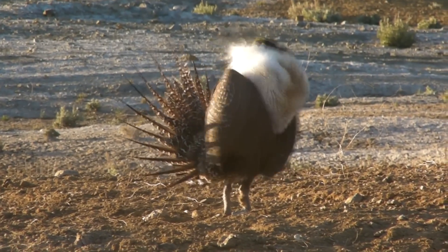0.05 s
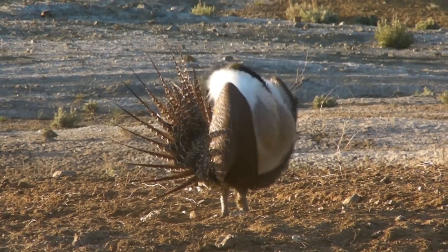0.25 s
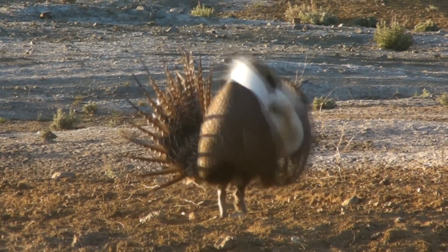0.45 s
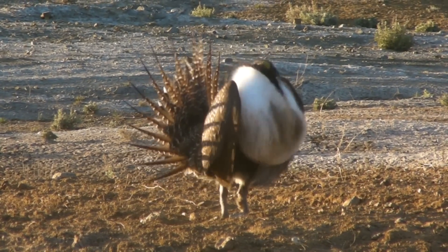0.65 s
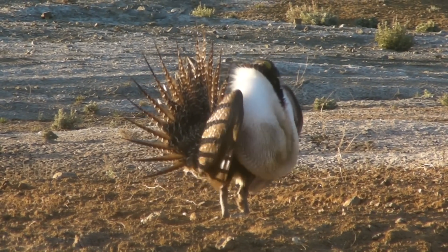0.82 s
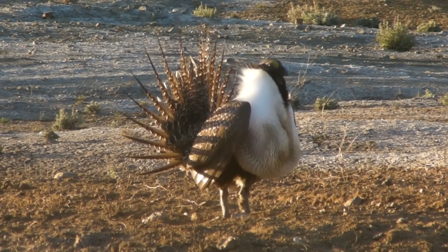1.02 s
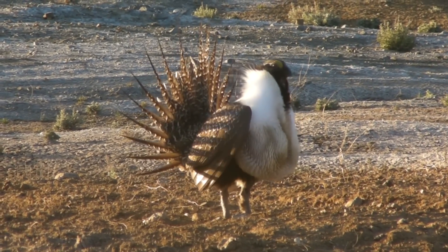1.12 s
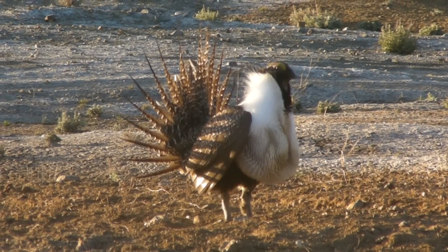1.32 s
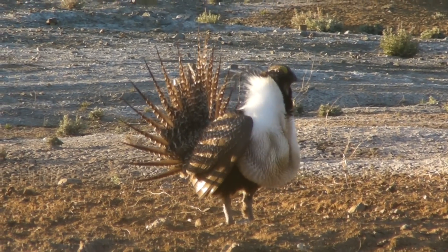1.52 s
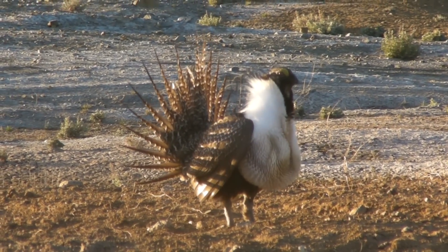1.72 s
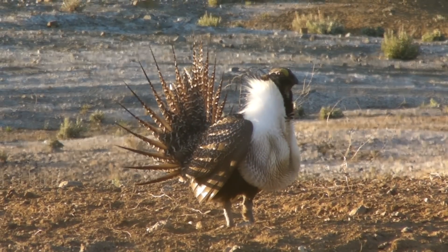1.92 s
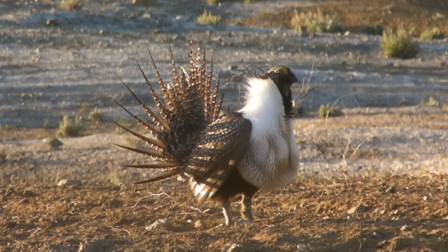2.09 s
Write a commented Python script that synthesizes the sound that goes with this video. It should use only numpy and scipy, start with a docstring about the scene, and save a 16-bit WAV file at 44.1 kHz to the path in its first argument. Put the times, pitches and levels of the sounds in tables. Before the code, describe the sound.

A male sage grouse displays: soft coos, two sharp pops with a swooping whistle between, feathers swishing

```python
"""Air hisses faintly over an open plain while a male sage grouse brushes wings on stiff breast feathers (shaped
noise) and his air sacs throb (short cosine bursts). He coos softly, and whistles from him and his neighbours
glide (gliding sines); his sacs pop twice (sharp pulses), a thin whistle swooping between the pops. Farther off
other males plop (short tone plus noise slap) and a small bird pipes (sines)."""
import sys
import numpy as np
from scipy import signal
from scipy.fft import rfft, irfft, next_fast_len
from scipy.io import wavfile
from scipy.ndimage import map_coordinates

SR = 44100
rng = np.random.default_rng(int(sys.argv[2]) if len(sys.argv) > 2 else 0)


def materialize(psi):
    """Save the field psi as 16-bit PCM at rate SR to the path in sys.argv[1].

    A 1-D psi becomes a single channel; in a 2-D psi each row is a channel.
    """
    bounded = np.clip(np.atleast_2d(psi).T, -1, 1)
    quanta = np.round(bounded * 32767).astype(np.int16)
    wavfile.write(sys.argv[1], SR, quanta)


N = 94815  # samples


def amp(db):
    """Decibels to gain."""
    return 10 ** (np.asarray(db) / 20)


def unit(x):
    """Scale to rms 1."""
    return x / np.sqrt(np.mean(x ** 2) + 1e-20)


def along(points, hz):
    """Interpolate (Hz, value) points on a log frequency axis."""
    point_hz, value = np.transpose(points)
    return np.interp(np.log(hz + 1), np.log(point_hz + 1), value)


def clock():
    """Time of each sample in seconds."""
    return np.arange(N) / SR


def wobble(knots_per_s):
    """Smooth random curve through normally distributed knots."""
    return map_coordinates(rng.standard_normal(N // 8), [clock() * knots_per_s + 2])


def filtered(x, response):
    """Multiply the spectrum of x by a response of frequency."""
    size = next_fast_len(N + SR // 2)
    hz = np.fft.rfftfreq(size, 1 / SR)
    return irfft(rfft(x, size) * response(hz), size)[..., :N]


def swell(peak_s, rise_s, fall_s):
    """Two-sided Gaussian envelope; rise and fall are its standard deviations."""
    t = clock() - peak_s
    return np.exp(-.5 * (t / np.where(t < 0, rise_s, fall_s)) ** 2)


def ring(peak_s, hz):
    """Cosine with a crest at peak_s."""
    return np.cos(2 * np.pi * hz * (clock() - peak_s))


def panned(x, db):
    """Raise the left by db and lower the right by db."""
    return x * amp([[db], [-db]])


def notes(tables, rough, flutter_per_s, edge_s=0.0022):
    """Sines that follow pitch and level tracks; random flutter moves phase and level."""
    t = clock()
    out = np.zeros(N)
    for rows in tables:
        s, hz, db = np.transpose(rows)
        phase = 2 * np.pi * np.cumsum(np.interp(t, s, hz)) / SR
        phase += rough * wobble(flutter_per_s)
        gate = np.clip(np.minimum(t - s[0], s[-1] - t) / edge_s + .5, 0, 1)
        level = gate * amp(np.interp(t, s, db))
        level *= 1 + rough * wobble(flutter_per_s)
        out += np.sqrt(2) * level * np.sin(phase)
    return out


# Air spectrum. Each row: frequency in Hz, relative density in dB per Hz.
AIR_SPECTRUM = [(15, -57), (25, -36), (76, -5.5), (113, -2), (170, -4), (291, -15), (371, -3), (513, -7),
                (620, -12.5), (857, -12.5), (1280, -16), (2520, -18.5), (3130, -16.5), (4330, -19.5),
                (4950, -20), (14200, -24.5), (15800, -29)]
# Air width. Each row: frequency in Hz, left-right correlation.
AIR_LIKENESS = [(60, 0.93), (150, 0.83), (380, 0.36), (950, 0.15), (2380, 0.39), (5980, -0.026),
                (15000, 0.015)]
# Air balance. Each row: frequency in Hz, left minus right in dB.
AIR_LEAN = [(60, 4.5), (150, 0), (380, 6.5), (950, 6), (2380, 3), (5980, 1.5), (15000, 2)]
AIR_RMS_DB = -57


def air():
    """Steady noise: hiss, low rumble and the blurred hum of the far flock, off to the left."""
    def mid_side(hz):
        angle = np.arccos(np.clip(along(AIR_LIKENESS, hz), -1, 1)) / 2  # sets the correlation
        return amp(along(AIR_SPECTRUM, hz)) * np.array([np.cos(angle), np.sin(angle)])

    def lean(hz):
        return amp(np.outer([1, -1], along(AIR_LEAN, hz)) / 2)

    mid, side = filtered(rng.standard_normal((2, N)), mid_side)
    return amp(AIR_RMS_DB) * unit(filtered(np.array([mid + side, mid - side]), lean))


# Breast plumage as it heaves. Each row: time in seconds, level in dB.
RUSTLE_LEVEL = [(.15, -62.5), (.25, -59.5), (.36, -61.5), (.45, -58), (.70, -65.5), (.85, -68)]
# Rustle colour. Each row: frequency in Hz, relative gain in dB.
RUSTLE_COLOUR = [(300, -30), (1000, -1.5), (4000, 4), (8000, -4), (15000, -3.5)]


def plumage(grain_db=2, grain_per_s=300):
    """Heaving plumage rustles softly throughout: grainy noise, independent in each ear."""
    s, db = np.transpose(RUSTLE_LEVEL)
    grains = rng.standard_normal((2, N)) * amp(grain_db * wobble(grain_per_s))
    rustle = unit(filtered(grains, lambda hz: amp(along(RUSTLE_COLOUR, hz))))
    return amp(np.interp(clock(), s, db)) * rustle


# Feather swishes. Each row: peak in seconds, level in dB, centre in Hz, rise in seconds, fall in seconds.
FEATHER_SWISHES = [(.010, -51.5, 3700, 0.015, 0.012), (.027, -61.5, 6160, .006, 0.008),
                   (.168, -56, 5300, 0.0015, 0.0028), (0.3979, -39.5, 1940, 0.00062, 0.00091),
                   (0.414, -55, 3800, 0.026, 0.021), (0.492, -48.5, 1500, 0.01, .002),
                   (0.494, -49, 3150, .005, 0.009), (0.504, -38.5, 1600, 0.0044, 0.006),
                   (0.511, -52.5, 2940, 0.018, 0.0098), (.570, -60, 2970, 0.005, 0.025),
                   (0.576, -58, 1070, 0.018, 0.023), (0.681, -52.5, 3700, .003, 0.0043),
                   (0.698, -50.5, 3020, 0.013, 0.014), (0.768, -56, 4150, 0.0018, 0.0036),
                   (1.385, -48.5, 3580, .001, 0.0031), (1.437, -57.5, 1500, .004, 0.0046),
                   (1.696, -53.5, 1550, 0.00078, 0.0043)]
SWISH_SIDE_DB = -6  # left-right difference relative to the common part
SWISH_OCTAVES = 0.46  # standard deviation of the band
SKIRT_DB, SKIRT_HZ = -17, 6000  # broad floor under the band, and its corner


def feathers(grain_db=2.5, grain_per_s=700):
    """Stiff feathers scrape in short swishes: grainy noise in a band on a broad skirt."""
    out = np.zeros((2, N))
    for peak_s, db, centre_hz, rise_s, fall_s in FEATHER_SWISHES:
        def colour(hz):
            band = np.exp(-.5 * (np.log2((hz + 1) / centre_hz) / SWISH_OCTAVES) ** 2)
            skirt = amp(SKIRT_DB) / (1 + (hz / SKIRT_HZ) ** 4)
            return band + skirt

        scrape = rng.standard_normal((2, N)) * amp(grain_db * wobble(grain_per_s))
        out += amp(db) * swell(peak_s, rise_s, fall_s) * unit(filtered(scrape, colour))
    mid, side = out[0], amp(SWISH_SIDE_DB) * out[1]
    return np.array([mid + side, mid - side])


# Air-sac throbs of the near male.
# Each row: peak in seconds, level in dB, pitch in Hz, rise in seconds, fall in seconds.
SAC_THROBS = [(0.048, -46.5, 132, 0.0054, 0.024), (0.409, -44.5, 164, 0.0035, 0.0037),
              (0.5046, -26.5, 172.5, 0.0038, 0.0039), (0.571, -41.5, 171, 0.0078, 0.0099),
              (0.699, -49.5, 217, 0.0075, 0.021), (1.441, -40.5, 182, .004, 0.0033),
              (1.640, -44, 295, 0.0016, 0.0025), (1.703, -56.5, 133, 0.0088, .012)]


def throbs():
    """The air in a sac swings for a few cycles: a cosine under a short swell."""
    out = np.zeros(N)
    for peak_s, db, hz, rise_s, fall_s in SAC_THROBS:
        out += amp(db) * swell(peak_s, rise_s, fall_s) * ring(peak_s, hz)
    return out


# Coos, one list a note. Each row: time in seconds, pitch in Hz, level in dB.
COO_NOTES = [
    [(.205, 407, -72), (.216, 371, -50.5), (.226, 355, -51.5)],
    [(.228, 385.5, -67), (.240, 476, -48.5), (.250, 467, -41.5), (.256, 450, -56)],
    [(.256, 450, -64), (.263, 444, -43.5), (.284, 402, -49.5), (.293, 375, -47)],
    [(.300, 410, -64), (.323, 428, -44.5), (.335, 470, -37), (.346, 506, -33), (.357, 513, -33),
     (.380, 517, -41), (.385, 469, -45), (.398, 480, -48)],
    [(.400, 480, -38.5), (.405, 487, -42), (.422, 512, -45), (.442, 494, -54), (.454, 430, -38.5),
     (.462, 375, -51.5), (.474, 352, -48.5)],
    [(.483, 420, -56), (.494, 403, -46), (.503, 373, -45.5), (.514, 420, -72)],
    [(.586, 378.4, -59), (.594, 357, -39), (.600, 382, -44.5), (.608, 362, -50), (.618, 360, -63)],
    [(.673, 370, -41), (.678, 336, -52.5), (.686, 325, -43), (.693, 326, -46), (.699, 375.5, -29),
     (.710, 373, -30.5), (.718, 372, -42), (.729, 377, -77)],
    [(.752, 382.4, -69), (.759, 376, -44.5), (.765, 360, -45.5), (.774, 370, -77)],
]


def coos():
    """Soft low notes: gliding sines, almost steady."""
    return notes(COO_NOTES, rough=0.026, flutter_per_s=210)


# Whistles of this male and his neighbours, one list each. Each row: time in seconds, pitch in Hz, level in dB.
WHISTLE_NOTES = [
    [(.405, 1080, -64), (.425, 1376, -60), (.443, 1770, -60.5), (.461, 2580, -59.5), (.469, 2480, -69)],
    [(.512, 1059, -60), (.524, 1240, -51.5), (.540, 1431, -50), (.551, 1830, -52), (.562, 2463, -52.5),
     (.568, 2574, -46.5), (.574, 2270, -44.5), (.582, 1390, -50.5), (.590, 830, -59), (.602, 574, -54.5),
     (.622, 830, -63), (.642, 1390, -65), (.647, 1600, -70)],
    [(.585, 1250, -60), (.600, 1507, -63), (.611, 1990, -60), (.619, 2295, -69), (.628, 2470, -67),
     (.636, 1760, -53), (.640, 1600, -67)],
    [(1.428, 861, -69), (1.445, 881, -56), (1.465, 1200, -68), (1.485, 1550, -68)],
]


def whistles():
    """Thin swooping whistles: gliding sines with a rough flutter."""
    return notes(WHISTLE_NOTES, rough=0.3, flutter_per_s=450)


# Sac skin snaps taut and flaps. Each row: time in seconds, level in dB.
FIRST_SNAPS = [(.4971, -21.5), (.4980, -18), (.4999, -32.5), (.5027, -37), (.5034, -31), (.5041, -24),
               (.5061, -42)]
SECOND_SNAPS = [(.6962, -19)]
# Snap colours. Each row: frequency in Hz, relative gain in dB.
FIRST_COLOUR = [(200, -28), (600, -5.5), (1100, -0.5), (2300, -2), (3400, 0.5), (4200, -13), (6000, -23),
                (10000, -28.5), (15000, -34)]
SECOND_COLOUR = [(300, -9), (1000, -8.5), (2200, -9.5), (3200, 2), (4600, -3.5), (6300, -19), (10000, -14),
                 (15000, -20)]


def pop(snaps, colour):
    """Each snap of the sac is one sharp minimum-phase pulse in the colour of the skin."""
    size = 2048
    gain = amp(along(colour, np.fft.rfftfreq(size, 1 / SR)))
    cepstrum = irfft(np.log(gain))
    cepstrum[1:size // 2] *= 2  # fold to minimum phase
    cepstrum[size // 2 + 1:] = 0
    pulse = irfft(np.exp(rfft(cepstrum)))
    pulse /= np.abs(pulse).max()
    out = np.zeros(N)
    for s, db in snaps:
        out[round(s * SR):][:size] -= amp(db) * pulse
    return out


# Far males' plops. Each row: peak in seconds, tone level in dB, sac pitch in Hz, slap level in dB.
FAR_PLOPS = [(.557, -46, 510, -50.5), (.924, -60.5, 437, -58.5), (.977, -47, 400, -58.5),
             (1.028, -53, 496, -62), (1.125, -53, 456, -59.5), (1.278, -48, 450, -60.5),
             (1.490, -56, 600, -57), (1.542, -48.5, 473, -64), (1.697, -65, 425, -59),
             (1.886, -69, 443, -59.5), (1.942, -52, 444, -59), (1.993, -51.5, 442, -57),
             (2.044, -66, 715, -62)]
# Slap colour. Each row: frequency in Hz, relative gain in dB.
SLAP_COLOUR = [(300, -5), (800, 2.5), (1700, -2), (2700, -4.5), (4500, -23), (10000, -40)]
PLOP_S, SLAP_S = 0.0023, 0.0044  # standard deviations of the envelopes


def plops():
    """Far pops arrive dull: a short hollow tone and a smeared noise slap."""
    noise = rng.standard_normal(N)
    slap = unit(filtered(noise, lambda hz: amp(along(SLAP_COLOUR, hz))))
    out = np.zeros(N)
    for peak_s, db, hz, slap_db in FAR_PLOPS:
        out += amp(db) * swell(peak_s, PLOP_S, PLOP_S) * ring(peak_s, hz)
        out += amp(slap_db) * swell(peak_s, SLAP_S, SLAP_S) * slap
    return out


# Small far bird, one list a note. Each row: time in seconds, pitch in Hz, level in dB.
PIPING_NOTES = [
    [(1.19, 4240, -73), (1.24, 4220, -67.5), (1.29, 4310, -72)],
    [(1.40, 4330, -71), (1.455, 4110, -68), (1.49, 4290, -68), (1.525, 4180, -77.5)],
]


def piping():
    """High thin notes of a small bird: sines with a rough flutter."""
    return notes(PIPING_NOTES, rough=0.3, flutter_per_s=220)


# Scatter from the ground. Each row: frequency in Hz, 60 dB decay time in seconds.
SCATTER_DECAY = [(150, .5), (500, 0.34), (3000, 0.79), (10000, 0.32)]


def plain(x):
    """Ground and brush scatter a faint tail: convolution with decaying stereo noise."""
    noise = rng.standard_normal((2, SR // 2))
    hz, t, bins = signal.stft(noise, SR, nperseg=256)
    decay = amp(-60 * t / along(SCATTER_DECAY, hz)[:, None])
    tail = signal.istft(bins * decay, SR, nperseg=256)[1]
    tail /= np.linalg.norm(tail[0])
    return signal.fftconvolve(x[None], tail, axes=1)[:, :N]


SCATTER_DB, NEAR_PAN_DB, FAR_PAN_DB = -19, 0.7, 0.55


def scene():
    """Mix the near male, the far birds, their scatter and the open air."""
    pops = pop(FIRST_SNAPS, FIRST_COLOUR) + pop(SECOND_SNAPS, SECOND_COLOUR)
    near = throbs() + coos() + whistles() + pops
    far = plops() + piping()
    near_stereo = panned(near + feathers() + plumage(), NEAR_PAN_DB)
    far_stereo = panned(far, FAR_PAN_DB)
    scatter = amp(SCATTER_DB) * plain(near + far)
    return near_stereo + far_stereo + scatter + air()


TOP_HZ = 15950


def record(dry):
    """Remove everything from the band limit up."""
    return filtered(dry, lambda hz: hz < TOP_HZ)


dry = scene()
out = record(dry)
materialize(out)
```